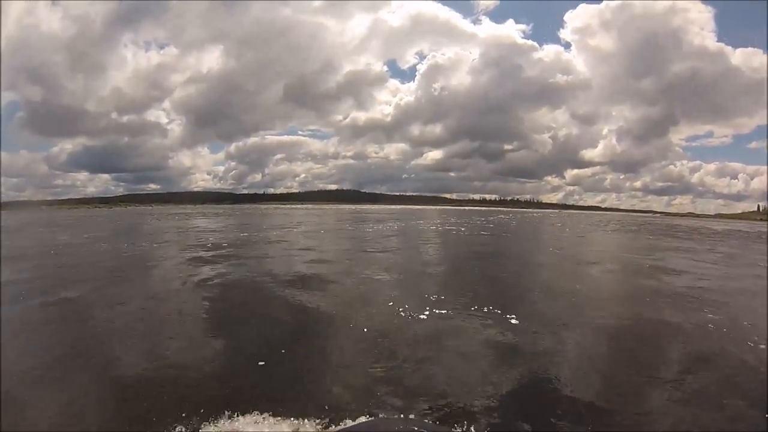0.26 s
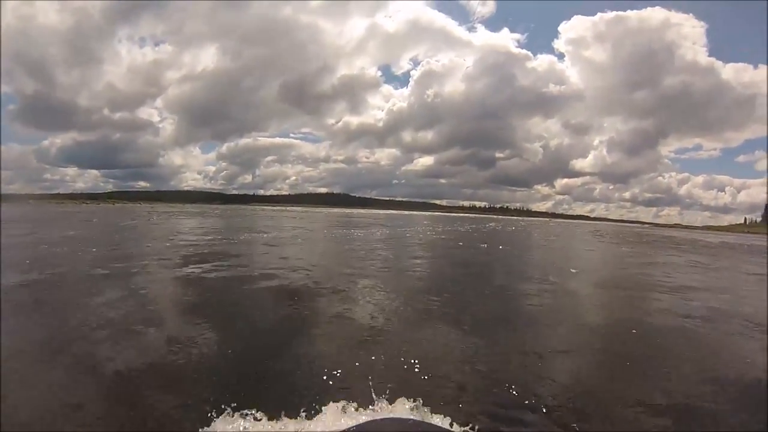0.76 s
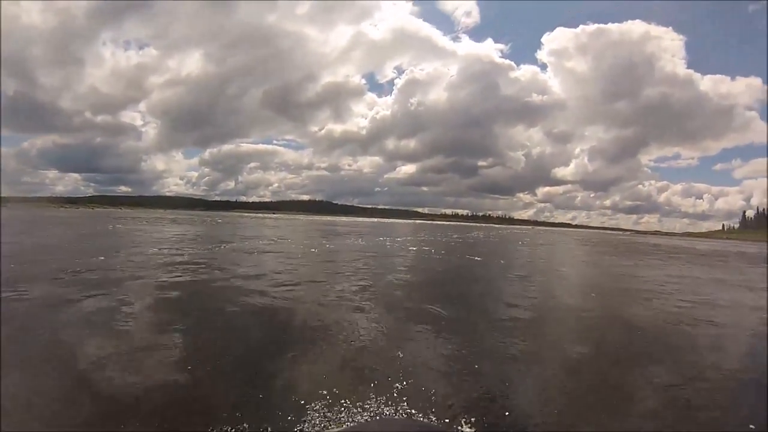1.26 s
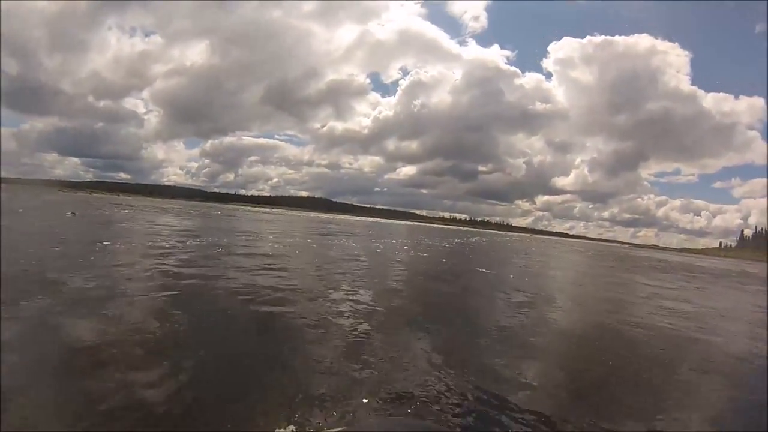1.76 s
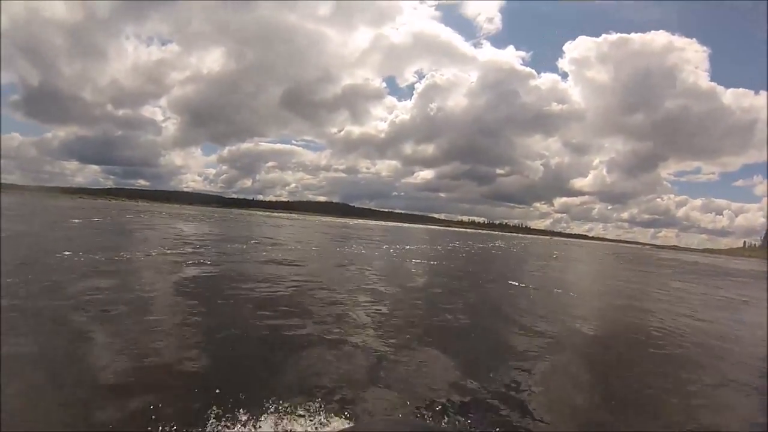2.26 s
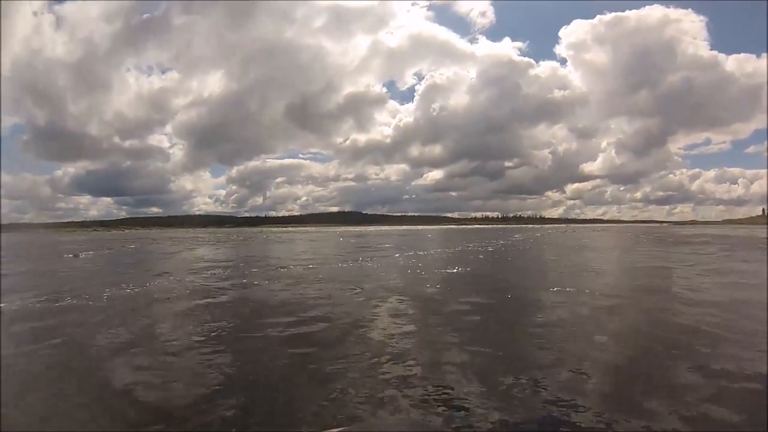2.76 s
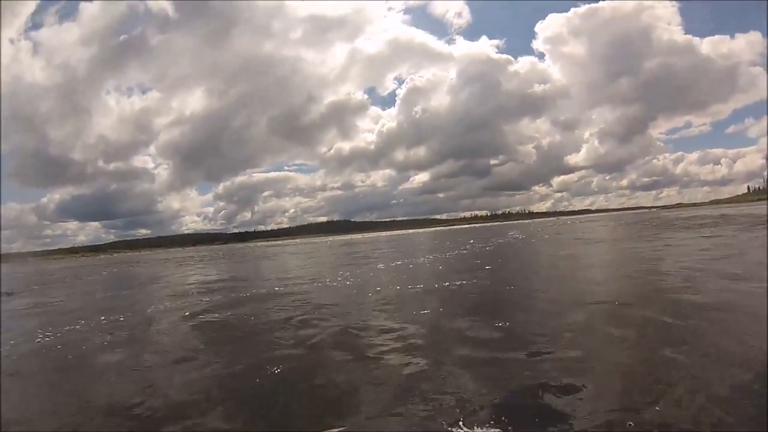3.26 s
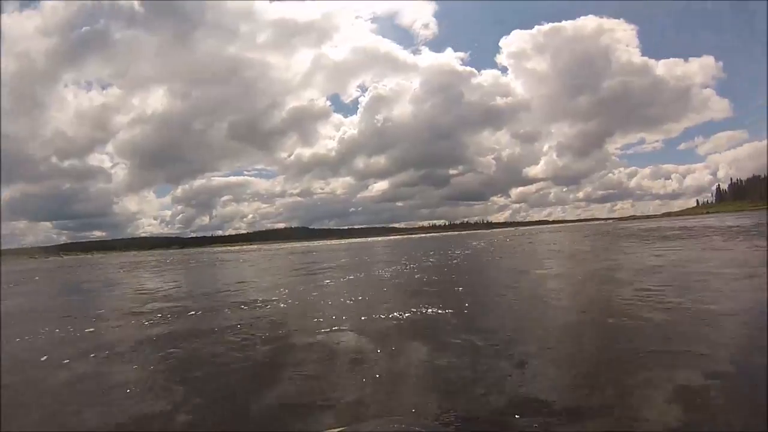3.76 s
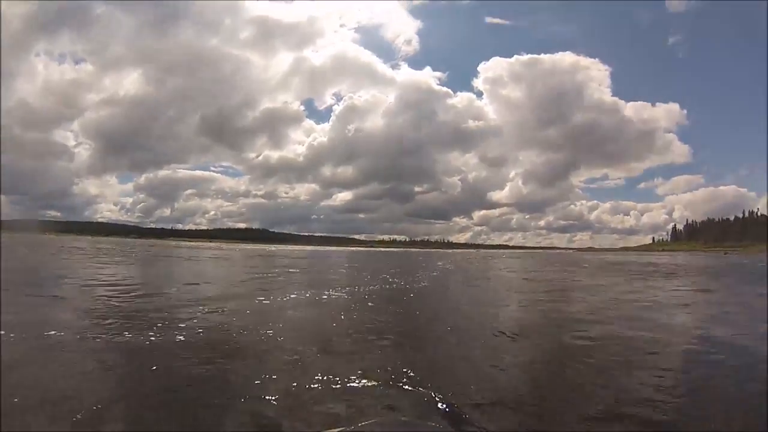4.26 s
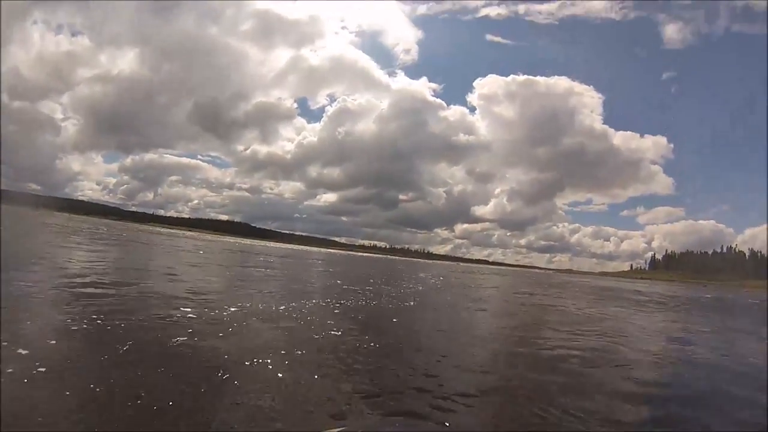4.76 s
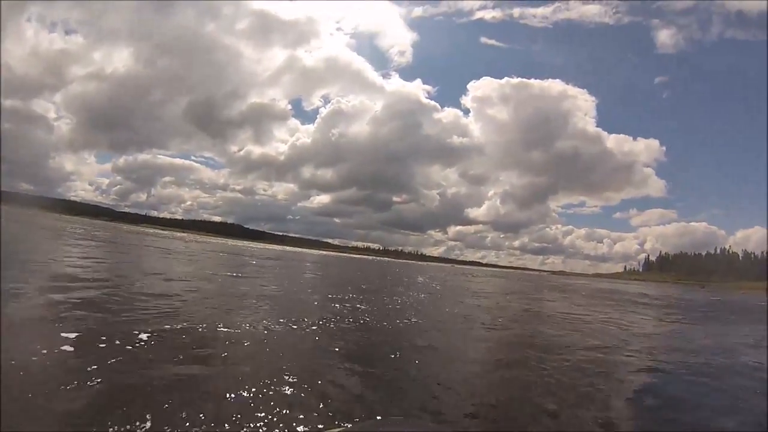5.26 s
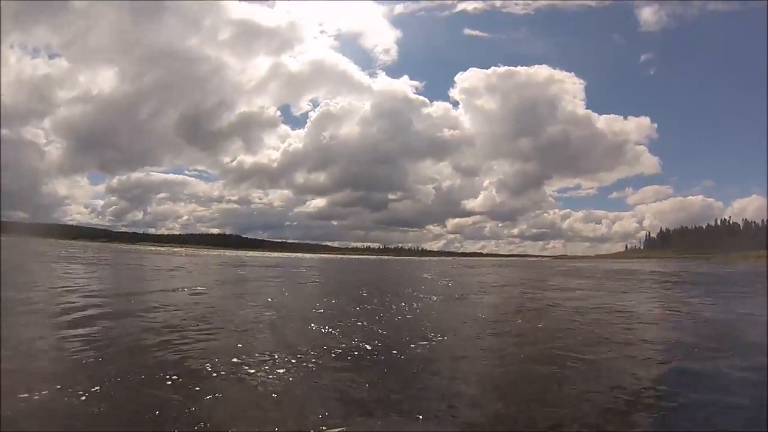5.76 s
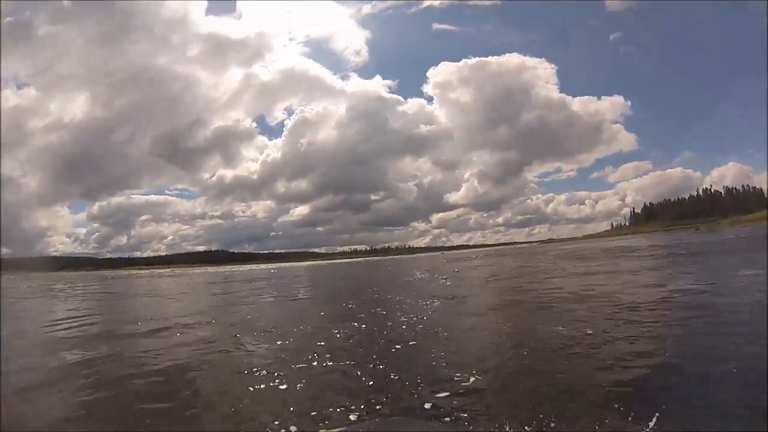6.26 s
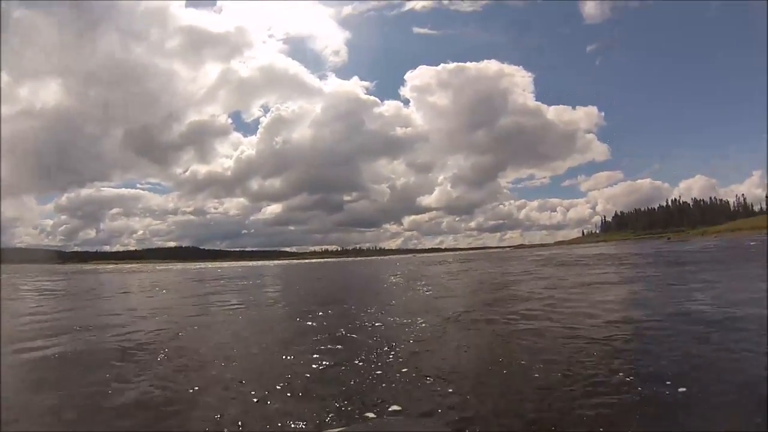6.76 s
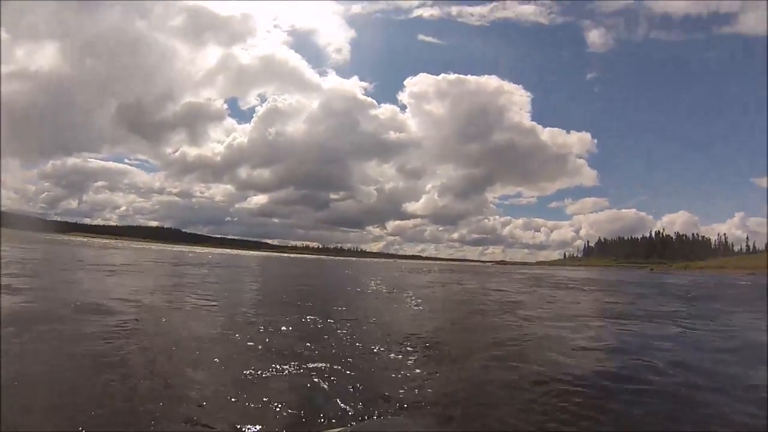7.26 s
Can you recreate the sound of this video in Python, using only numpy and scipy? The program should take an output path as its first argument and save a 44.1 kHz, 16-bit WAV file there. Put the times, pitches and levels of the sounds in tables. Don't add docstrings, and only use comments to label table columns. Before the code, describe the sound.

A small jet boat accelerates on open water, heard through its hull: deep throbbing drone climbing in pitch, rattling knocks, watery rumble and faint ticks.

```python
import sys
import numpy as np
from scipy import signal
from scipy.fft import rfft, irfft, next_fast_len
from scipy.io import wavfile
from scipy.ndimage import map_coordinates

SR = 44100
rng = np.random.default_rng(int(sys.argv[2]) if len(sys.argv) > 2 else 0)


def output_pcm(signal):
    pcm = np.clip(np.atleast_2d(signal).T, -1, 1) * 32767
    wavfile.write(sys.argv[1], SR, np.round(pcm).astype(np.int16))


def magnitude_from_level(level_db):
    exponent = np.asarray(level_db, float) / 20
    return 10 ** exponent


N = 332065
TIME = np.arange(N) / SR
STEP = 64


def dense(control):
    return np.interp(np.arange(N) / STEP, np.arange(len(control)), control)


def curves(rows):
    s, *cols = np.transpose(rows)
    return [np.interp(TIME, s, c) for c in cols]


def wobble(rate):
    knots = rng.standard_normal(int(N * rate / SR) + 4)
    return dense(map_coordinates(knots, [np.arange(0, N + STEP, STEP) * rate / SR]))


def spells(rows, power=2, fall=1):
    s, height, width = np.transpose(rows)[:, :, None]
    away = (np.arange(0, N + STEP, STEP) / SR - s) / width
    return height, np.maximum(-away, away / fall) ** power


def bumps(rows):
    height, away = spells(rows)
    return dense(np.sum(height * np.exp(-away), axis=0))


def tone(turns, db):
    return np.sqrt(2) * magnitude_from_level(db) * np.cos(2 * np.pi * turns)


def unit(x):
    return x / np.sqrt(np.mean(x ** 2) + 1e-20)


def filtered(x, response):
    m = next_fast_len(N + SR // 2)
    return irfft(rfft(x, m) * response(np.fft.rfftfreq(m, 1 / SR)), m)[..., :N]


def colour(points):
    f, db = np.transpose(points)
    return lambda hz: magnitude_from_level(np.interp(np.log(hz + 1), np.log(f + 1), db, -120, -120))


def rush(points):
    return unit(filtered(rng.standard_normal(N), colour(points)))


# (time [s], speed [Hz])
SHAFT_SPEED = [(0, 37), (.25, 38.9), (.5, 45.2), (.9, 50.44), (1.15, 45.67), (1.4, 43.6), (1.72, 54.28),
               (2.08, 43.79), (2.33, 56.48), (2.52, 54), (3.0, 63.7), (3.55, 72), (4.22, 75), (4.55, 73.1),
               (5.9, 69.3), (6.62, 78), (7.2, 71.6), (7.53, 70.8)]


def shaft_hz():
    return curves(SHAFT_SPEED)[0]


# (time [s], offset [Hz], half width [s])
HULL_DRAGS = [
    (.46, 4.9, .03),
    (1.6, -9.76, .07),
    (1.85, -9.65, .08),
    (2.14, -7.95, .06),
    (2.58, 3.2, .22),
]


def hull_hz():
    return shaft_hz() + bumps(HULL_DRAGS)


# (time [s], hull shake [dB], second order [dB])
HULL_SHAKE = [(0, -13, -52), (.3, -15.5, -60), (.75, -17, -50), (.95, -17, -29), (1.2, -14.5, -45),
              (1.65, -17, -42), (1.82, -12, -30), (2.05, -13.5, -50), (2.33, -18.5, -28),
              (2.65, -17.5, -52), (3.0, -18.5, -30), (3.35, -17, -29), (3.65, -16, -50), (3.92, -16.5, -28),
              (5.1, -22, -30), (5.7, -23.5, -24.5), (6.5, -18.5, -28), (7.53, -18, -36)]
# (time [s], dip [dB], half width [s])
WAVE_LULLS = [(.82, -6, .02), (1.775, -10, .03), (1.96, -6, .03), (2.215, -12, .035), (2.49, -9, .05),
              (3.035, -9, .07), (4.76, -7, .09), (5.03, -4, .06), (5.29, -7, .07), (5.53, -4, .06),
              (5.91, -4, .07)]
# (time [s], change [dB], half width [s])
SECOND_SWINGS = [
    (1.07, 9, .06),
    (5.13, -10, .07),
    (5.53, -10, .05),
    (6.16, -20, .07),
    (6.53, -8, .06),
    (6.92, 7, .05),
    (7.29, 5, .12),
]
# (time [s], lead [turns], half width [s])
RESONANCE_LEAD = [
    (2.02, .3, .3),
]


def hull_shake(shaft):
    hull = np.cumsum(hull_hz()) / SR
    shake_db, second_db = curves(HULL_SHAKE)
    shake_db = shake_db + bumps(WAVE_LULLS) + 1.2 * wobble(8)
    second_db = second_db + bumps(SECOND_SWINGS) + 2.5 * wobble(6)
    return tone(hull - 1 / 3 + bumps(RESONANCE_LEAD), shake_db) + tone(2 * shaft, second_db)


# (time [s], blade tone [dB], engine whine [dB])
PUMP_LOAD = [(0, -35, -56), (.45, -35, -43), (.62, -28, -44), (.95, -27, -43), (1.25, -34, -50),
             (1.6, -26, -45), (1.77, -15, -43), (1.86, -30, -44), (2.17, -36, -45), (2.29, -16, -45),
             (2.72, -22, -38), (2.92, -18.5, -45), (3.25, -19, -38.5), (3.75, -26, -41.5),
             (4.85, -23.5, -38.5), (5.65, -16.5, -33), (6.25, -21, -37), (7.53, -21.5, -38)]


def load_levels():
    return curves(PUMP_LOAD)


BEAT_NULLS = [-0.001, .35, .72, .97, 1.402, 1.85, 2.07, 2.37, 2.618, 2.868, 3.1, 3.299, 3.598, 3.851, 4.05,
              4.299, 4.568, 4.82, 5.049, 5.328, 5.668, 5.97, 6.35, 6.631, 6.902, 7.1, 7.37, 7.631]


def firing_turns(shaft):
    slipped = np.interp(TIME, BEAT_NULLS, np.arange(len(BEAT_NULLS)))
    return 3 * shaft - slipped - 1 / 2


# (time [s], firing over blade amplitude [ratio])
BEAT_DEPTH = [
    (0, 0.22),
    (2.6, .3),
    (3.5, 0.63),
    (6, .9),
    (6.5, 0.4),
    (7.53, .9),
]
# (time [s], change [dB], half width [s])
BLADE_SURGES = [
    (.58, 3, .05),
    (.73, -6, .03),
    (.86, 2, .05),
    (1.69, -4, .02),
    (1.9, -7, .03),
    (1.97, 6, .03),
    (2.05, -5, .04),
]


def blade_beat(shaft, firing):
    depth = curves(BEAT_DEPTH)[0]
    blade_db = load_levels()[0] + bumps(BLADE_SURGES) + .8 * wobble(7)
    return (tone(3 * shaft, blade_db) + depth * tone(firing, blade_db)) / np.hypot(1, depth)


CYCLE_ORDERS = {1: 3, 2: 1.3, 3: 0, 5: 1, 7: -9, 9: -6.5, 10: -9.5, 11: -6, 12: -1.5, 13: -12, 14: -12, 16:
                -14, 17: -13, 18: -13}
# (centre [Hz], half width [Hz], lift [dB])
DECK_RESONANCES = [(485, 25, 1.2), (615, 30, 5.2), (920, 40, 5)]


def engine_orders(firing, sway):
    whine_db = load_levels()[1]
    idle = np.clip((2.6 - TIME) / .4, 0, 1)
    speed = shaft_hz()[::STEP]
    sound = np.zeros(N)
    for order, db in CYCLE_ORDERS.items():
        order_hz = order * speed * 3 / 4
        lift_db = sum(top / (1 + ((order_hz - hz) / width) ** 2) for hz, width, top in DECK_RESONANCES)
        order_db = whine_db - (7 + 1.3 * order) * idle + db + dense(lift_db) + 2.5 * wobble(8)
        sound += tone(order * (firing / 4 + 0.012 * sway), order_db)
    return sound


SHAFT_ORDERS = {4: 0.33, 5: -4.5, 6: -12}
# (time [s], lift [dB], half width [s])
VANE_HUMS = [
    (.78, 14, .08),
    (1.1, 27, .14),
    (1.45, 22, .05),
]


def shaft_orders(shaft, sway):
    whine_db = load_levels()[1]
    sound = np.zeros(N)
    for order, db in SHAFT_ORDERS.items():
        hum_db = (order == max(SHAFT_ORDERS)) * bumps(VANE_HUMS)
        sound += tone(order * (shaft + 0.011 * sway), whine_db + db - 1 + hum_db + 2.5 * wobble(7))
    return sound


# (time [s], change [Hz], half width [s])
SHAFT_SAGS = [
    (1.85, -7, .05),
    (1.96, -2, .04),
    (2.1, -5, .06),
]


def drive():
    shaft = np.cumsum(shaft_hz() + bumps(SHAFT_SAGS)) / SR
    firing = firing_turns(shaft)
    sway = wobble(9)
    tones = hull_shake(shaft) + blade_beat(shaft, firing)
    return tones + engine_orders(firing, sway) + shaft_orders(shaft, sway)


# (time [s], chop as thud [dB], spray [dB])
WATER_FLOW = [(0, -39, -80), (.35, -36.5, -79), (1.01, -30, -69.5), (1.32, -36.5, -78), (1.75, -29.5, -73),
              (2.0, -35, -75), (2.37, -34, -74), (2.7, -27, -72.5), (3.3, -26.5, -72), (3.8, -28.5, -72.5),
              (4.5, -29.5, -71), (5.04, -24.5, -64), (5.4, -25.5, -65), (5.89, -28, -66.5),
              (6.45, -24.5, -64), (6.75, -29, -68.5), (7.1, -27, -67), (7.53, -26, -65.5)]


def flow_levels():
    return curves(WATER_FLOW)


# (time [s], dip [dB], half width [s])
SPRAY_CALMS = [
    (.36, -5, .07),
    (1.3, -6, .02),
    (1.45, -5, .05),
    (1.95, -7, .04),
    (2.24, -7, .06),
    (4.53, -4, .04),
]


def calms():
    return bumps(SPRAY_CALMS)


# (frequency [Hz], level [dB])
THUD_SPECTRUM = [(12, -47), (22, -2.5), (30, 1.2), (55, -4), (90, -8.5), (130, -12.5), (200, -10.5),
                 (300, -45.5)]
PANEL_SPECTRUM = [(130, -23), (200, -5), (270, 1), (310, -13), (380, -25.5)]
DRUM_SPECTRUM = [(250, -38), (350, 3), (420, -5.5), (520, 5.5), (620, 2.5), (800, -1), (950, -5),
                 (1220, -10), (1500, -11.5), (2300, -19.5), (2700, -32.5), (3300, -34)]
NOZZLE_SPECTRUM = [(800, -24.5), (920, 3.5), (1050, 2), (1140, -4.5), (1230, -30.5)]
SPRAY_SPECTRUM = [(2400, -7.5), (3000, -5), (3400, -7), (3900, -2.5), (4500, -10), (6800, -11.5),
                  (8000, -16.5), (11500, -21.5), (14500, -29), (15800, -41.5)]


def water():
    thud_db, spray_db = flow_levels()
    flow_db = thud_db + 30
    slap_db = -31 + 1.05 * flow_db
    drum_db = -46 + .7 * flow_db + .35 * (spray_db + 71) + .2 * (load_levels()[0] + 25)
    chop, flutter, fizz = .6 * wobble(12), 1.4 * wobble(70), 2.3 * wobble(50)
    thud = magnitude_from_level(thud_db + 4.3 + 2.6 * wobble(5.5)) * rush(THUD_SPECTRUM)
    slap = magnitude_from_level(slap_db - 1.5 + 1.5 * wobble(28)) * rush(PANEL_SPECTRUM)
    nozzle = magnitude_from_level(-4) * np.clip(shaft_hz() / 20 - 2.6, 0, 1)
    drumming = rush(DRUM_SPECTRUM) + nozzle * rush(NOZZLE_SPECTRUM)
    drum = magnitude_from_level(drum_db + 6.3 + chop + flutter) * drumming
    spray = magnitude_from_level(spray_db + 7 + calms() + chop + fizz) * rush(SPRAY_SPECTRUM)
    return thud + slap + drum + spray


# (centre [s], knock [dB], time to fade by 10 dB [s])
KNOCK_SPELLS = [(.1, -50, .14), (.28, -35, .075), (.52, -34.5, .04), (.64, -35.5, .1), (.82, -41, .15),
                (1.01, -35.5, .06), (1.22, -42, .15), (1.38, -39.5, .06), (1.5, -40, .045), (1.66, -45, .1),
                (1.85, -27, .042), (2.1, -26.5, .052), (2.33, -44, .07), (2.64, -39.5, .17),
                (2.82, -40, .07), (4.15, -42.5, .15), (3.35, -42.5, .4), (3.75, -39.5, .2),
                (3.96, -36, .05), (4.38, -36, .1), (4.63, -37.5, .16), (5.0, -38.5, .05), (5.35, -38, .09),
                (5.65, -42.5, .3), (5.91, -37, .045), (6.15, -43, .3), (6.43, -36.5, .09), (6.7, -40, .2),
                (7.17, -33.5, .11), (7.4, -34.5, .3)]


def knocking():
    peak_db, away = spells(KNOCK_SPELLS, power=2.5, fall=1.6)
    knock_db = dense(np.maximum(np.max(peak_db - 10 * away, axis=0), -62))
    idle = np.clip((44 - shaft_hz()) / 5, 0, 1) * (np.arange(N) < SR)
    thump_db = np.minimum(5.5 - .9 * (knock_db + 38), 14) - 12 * idle
    return knock_db, thump_db


# (time [s], peak [dB])
IDLE_STRIKES = [(0.2122, -37), (0.2396, -26), (0.2656, -23), (0.292, -21), (0.3165, -26), (0.3414, -25),
                (0.3653, -30), (0.3898, -29), (0.496, -25), (0.5185, -23), (0.5414, -24), (0.5639, -28),
                (0.5828, -24), (0.6058, -25), (0.6267, -22), (0.6492, -23), (0.6692, -19), (0.6916, -24),
                (0.7116, -21), (0.733, -25), (0.7729, -32), (0.7924, -27), (0.8128, -26), (0.8338, -25),
                (0.9146, -31), (0.935, -26), (0.9555, -27), (0.9755, -25), (0.9944, -27), (1.0149, -22),
                (1.0368, -26), (1.0573, -23), (1.0802, -29), (1.1655, -29), (1.2094, -32), (1.2533, -30),
                (1.2758, -27), (1.3207, -33), (1.3451, -30), (1.3696, -26), (1.391, -28), (1.4115, -32),
                (1.4359, -30), (1.4584, -31), (1.4798, -26), (1.5217, -27), (1.5442, -26), (1.6863, -32)]
# (time [s], peak [dB])
RESONANT_STRIKES = [(1.8049, -22), (1.8253, -15), (1.8503, -21), (1.8742, -16), (1.8981, -17),
                    (2.0518, -22), (2.0767, -16), (2.1032, -14), (2.1276, -15), (2.1531, -17), (2.178, -23)]
# (time [s], peak [dB])
SPEED_STRIKES = [(2.2343, -35), (2.2518, -29), (2.5242, -33), (2.5411, -31), (2.5591, -28), (2.5786, -30),
                 (2.627, -27), (2.6758, -28), (2.7103, -30), (2.7267, -27), (2.7616, -28), (2.8115, -28),
                 (2.8455, -33), (2.8455, -25), (3.5159, -30), (3.6277, -29), (3.6826, -28), (3.725, -26),
                 (3.7798, -28), (3.9465, -27), (3.9599, -24), (3.9864, -26), (4.3241, -27), (4.3525, -24),
                 (4.3929, -24), (4.4069, -21), (4.4603, -25), (4.5281, -29), (4.5855, -28), (4.6284, -23),
                 (4.6663, -27), (4.7382, -23), (4.8743, -25), (5.0001, -24), (5.0819, -26), (5.3433, -29),
                 (5.5274, -28), (5.5743, -25), (5.6286, -28), (5.8731, -27), (5.901, -25), (5.916, -20),
                 (6.4213, -25), (6.4732, -26), (6.9317, -29), (6.9716, -28), (7.0284, -31), (7.0434, -22),
                 (7.0838, -29), (7.1252, -24), (7.1397, -19), (7.2115, -24), (7.2524, -21), (7.2933, -23),
                 (7.3053, -18), (7.3657, -27), (7.3767, -23), (7.4181, -23), (7.46, -22), (7.4605, -19)]


def strikes(knock_db):
    hz = hull_hz()
    strike_turn = 1.17
    hits = np.flatnonzero(np.diff(np.floor(np.cumsum(hz) / SR - strike_turn)) > 0)
    luck = rng.standard_normal((len(hits), 2))
    speed = np.clip((hz[hits] - 50) / 20, 0, 1)
    late = (luck[:, 0] * (.0002 + .0012 * speed) - .001) * SR
    hit_db = knock_db[hits]
    size_db = hit_db + 1.3 * np.minimum(hit_db + 41.5, 0) - 10 * np.log10(hz[hits] / 40) + 13.5 - 1.8 * speed
    blows = np.zeros(N)
    blows[np.clip(hits + late.astype(int), 0, N - 1)] = magnitude_from_level(size_db + (2.1 + 2.4 * speed) * luck[:, 1])
    for s, db in IDLE_STRIKES + RESONANT_STRIKES + SPEED_STRIKES:
        blows[round(s * SR) - 250:][:500] = 0
        blows[round(s * SR)] = magnitude_from_level(db + 3.5)
    rebounds = hits[:-1] + (30 + 30 * np.abs(luck[:-1, 0])).astype(int)
    blows[rebounds] += .15 * luck[1:, 1] * magnitude_from_level(size_db[:-1])
    return blows


def modes(blows, table, attack, scatter_db):
    t, at = np.arange(SR // 20) / SR, np.flatnonzero(blows)
    rings = np.array([(-1) ** k * magnitude_from_level(db - 60 * t / t60) * np.sin(2 * np.pi * hz * t)
                      for k, (hz, db, t60) in enumerate(table)])
    shares = blows[at, None] * magnitude_from_level(scatter_db * rng.standard_normal((len(at), len(table))))
    sound = shares @ (rings * (1 - np.exp(-t / attack)) ** 2)
    return np.bincount((at[:, None] + np.arange(len(t))).ravel(), sound.ravel(), N + len(t))[:N]


# (frequency [Hz], level [dB], 60 dB decay [s])
SHELL_MODES = [(1308, -5, 0.0089), (1500, -1.5, 0.011), (1707, -7.5, 0.01), (1886, -11, 0.02),
               (2255, -7, 0.012)]
MOUNT_MODES = [(638, 0.5, 0.019), (809, -5.5, 0.044)]
LATCH_MODES = [(3250, -1, .011), (3640, -5, .025), (3830, -2, .022), (4850, -10, .01), (5410, -1, .015),
               (6200, -20, .008)]


def case():
    knock_db, thump_db = knocking()
    blows = strikes(knock_db)
    shell = modes(blows, SHELL_MODES, attack=.0003, scatter_db=1.5)
    mount = modes(blows * magnitude_from_level(thump_db - 7.5), MOUNT_MODES, attack=.00078, scatter_db=1.4)
    latch = modes(blows * np.abs(blows / .15) ** .4, LATCH_MODES, attack=.0007, scatter_db=3)
    return shell + mount + magnitude_from_level(-23.5) * latch


# (time [s], peak [dB])
GAIN_STEPS = [(0.0633, -49), (0.1805, -53), (0.192, -45), (0.2828, -50), (0.4823, -47), (0.612, -47),
              (0.6694, -54), (0.849, -45), (0.8589, -44), (0.9807, -49), (1.0011, -46), (1.0844, -46),
              (1.1298, -49), (1.2057, -48), (1.2371, -49), (1.2565, -49), (1.3364, -48), (1.6686, -63),
              (1.6686, -45), (1.7629, -47), (1.8257, -44), (1.8367, -45), (1.8736, -47), (2.0048, -48),
              (2.0163, -47), (2.0253, -44), (2.0772, -48), (2.1031, -46), (2.1276, -47), (2.3905, -45),
              (2.6414, -47), (2.6599, -46), (2.7277, -46), (2.8135, -46), (2.9272, -45), (3.2221, -48),
              (3.267, -46), (3.3109, -46), (3.3583, -48), (3.5488, -49), (3.704, -46), (3.7913, -46),
              (3.903, -46), (3.917, -46), (4.0123, -46), (4.0721, -50), (4.2268, -48), (4.2667, -49),
              (4.4957, -43), (4.583, -50), (5.3163, -43), (5.463, -42), (5.7937, -43), (6.114, -44),
              (6.347, -43), (6.4133, -44), (6.7007, -46), (6.7166, -41), (6.9815, -49), (7.2504, -44)]
# (frequency [Hz], level [dB])
CLICK_SPECTRUM = [(600, -37.5), (2600, 2), (5000, -1.5), (9000, -9.5), (13000, -11), (15500, -19.5)]


def ticks():
    chance = 70 * magnitude_from_level(4 * wobble(6) + 2 * calms()) / SR
    steps = (rng.random(N) < chance) * magnitude_from_level(-38 + 6 * rng.standard_normal(N))
    steps *= magnitude_from_level(-.7 + 0.04 * (flow_levels()[1] + 69.5))
    for s, db in GAIN_STEPS:
        steps[round(s * SR)] = magnitude_from_level(db + 22)
    smear = np.append(1, .12 * rng.standard_normal(30) * np.hanning(30))
    return filtered(np.convolve(steps, smear)[:N], colour(CLICK_SPECTRUM))


# (time [s], level [dB], half width [s])
INTAKE_WHISTLES = [
    (4.12, -56, .07),
    (5.17, -52, .13),
    (5.75, -57, .1),
]
# (frequency [Hz], level [dB])
INTAKE_SPECTRUM = [(2050, -30), (2200, 0), (2300, 0), (2450, -30)]


def intake():
    peak_db, away = spells(INTAKE_WHISTLES)
    whistle_db = dense(np.max(peak_db - 10 * np.minimum(away, 6), axis=0))
    return magnitude_from_level(whistle_db + 2.2 * wobble(30)) * rush(INTAKE_SPECTRUM)


def scene():
    return (drive() + water() + case() + ticks() + intake())[None]


def band_limit(x):
    return signal.sosfilt(signal.butter(12, 15800, fs=SR, output="sos"), x)


def record(dry):
    held = dry / (1 + np.abs(dry / 1.1) ** 4) ** (1 / 4)
    return band_limit(held)


dry = scene()
out = record(dry)
output_pcm(out)
```